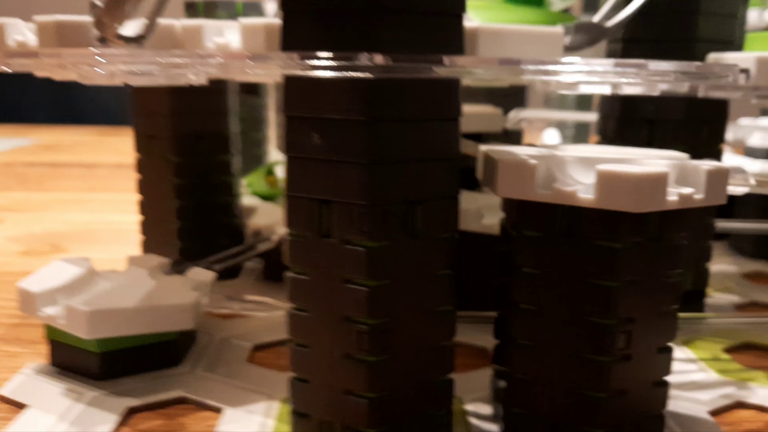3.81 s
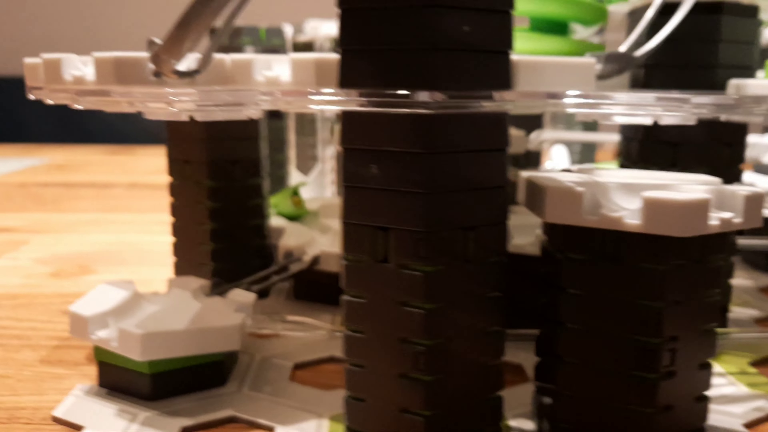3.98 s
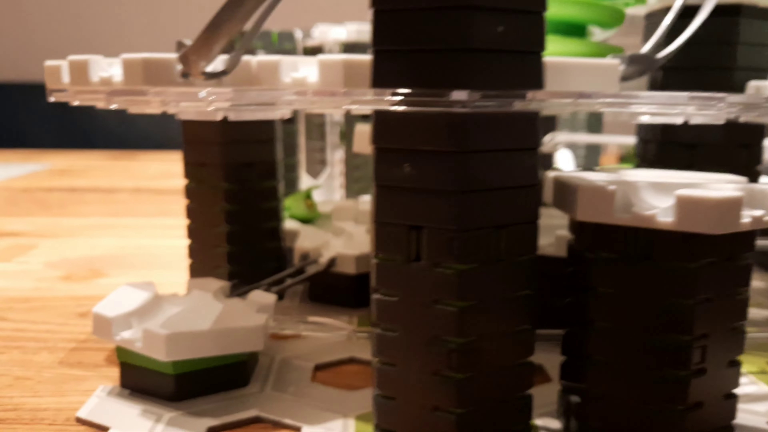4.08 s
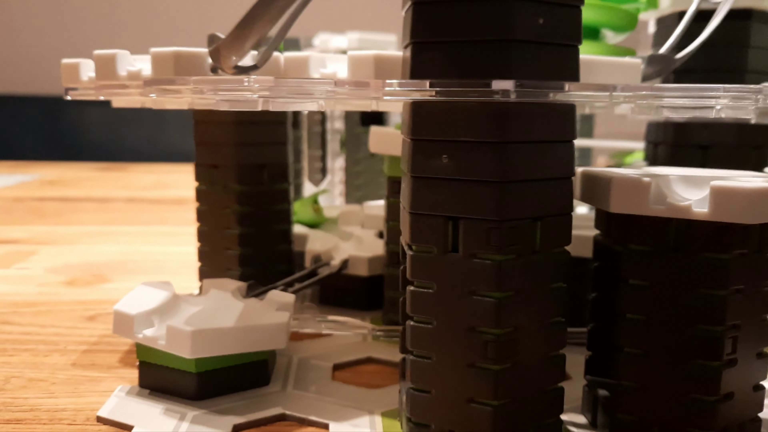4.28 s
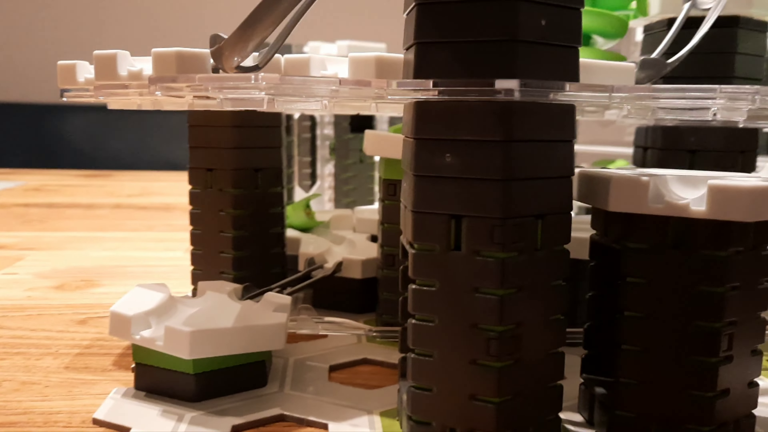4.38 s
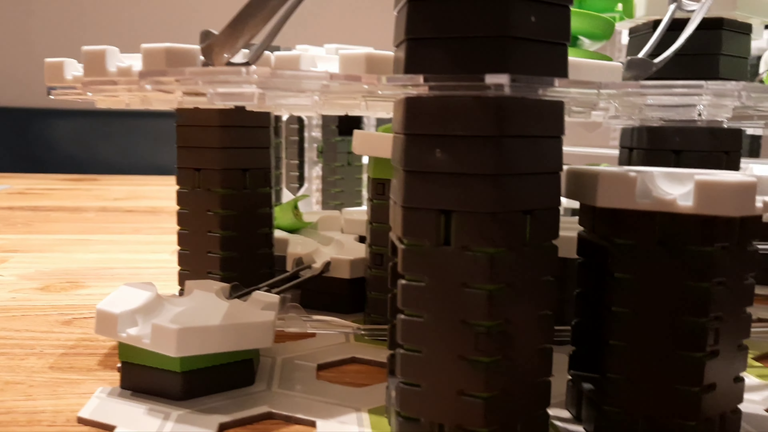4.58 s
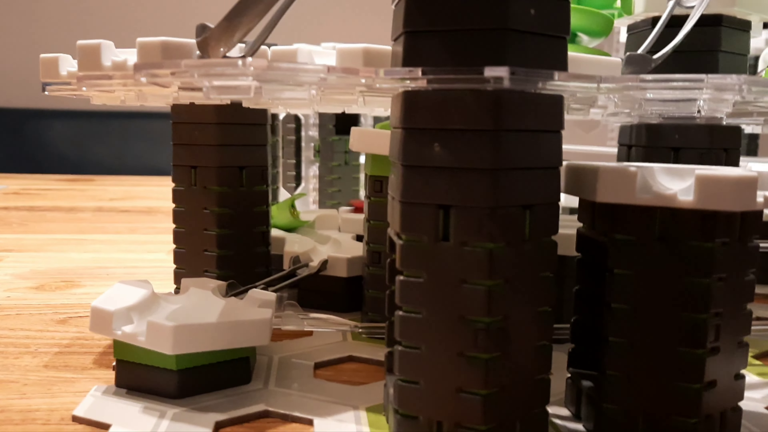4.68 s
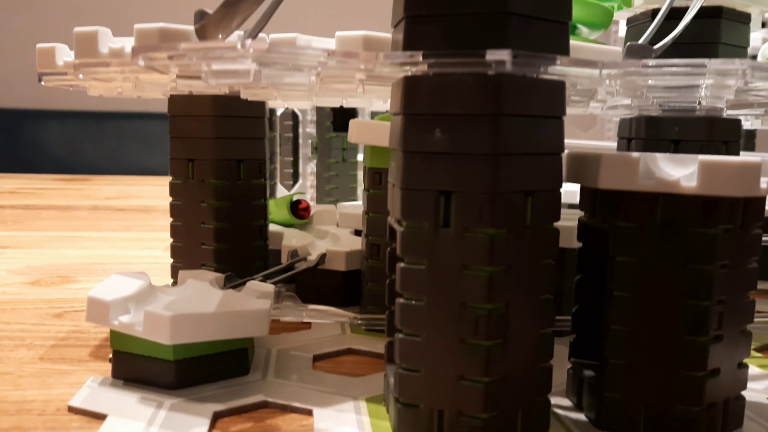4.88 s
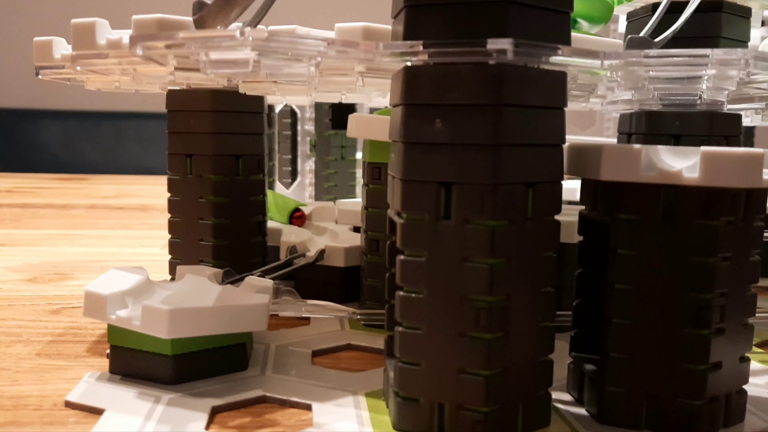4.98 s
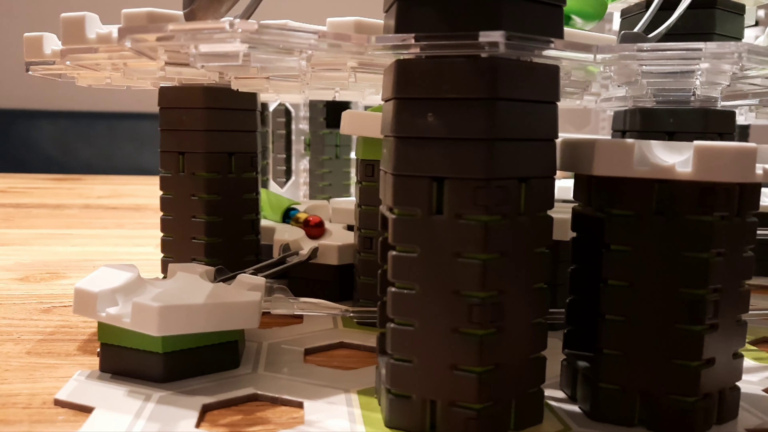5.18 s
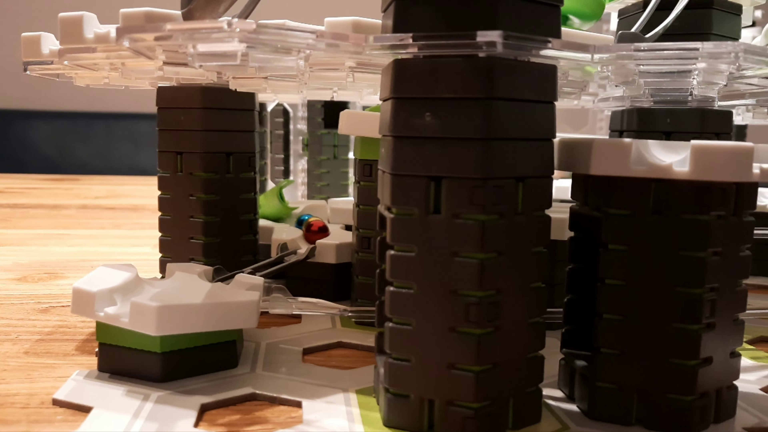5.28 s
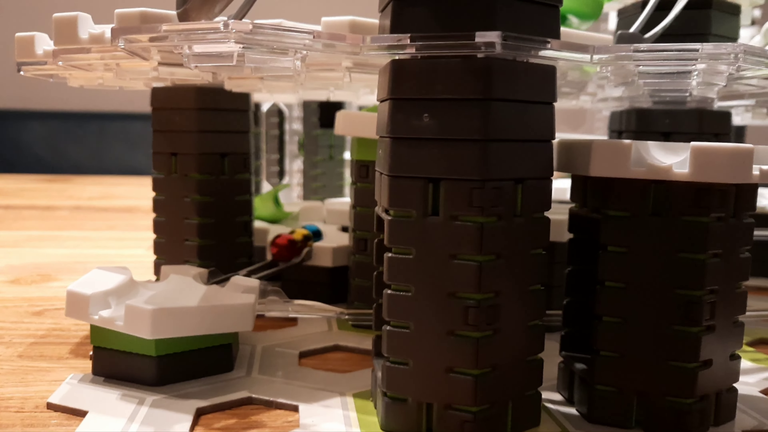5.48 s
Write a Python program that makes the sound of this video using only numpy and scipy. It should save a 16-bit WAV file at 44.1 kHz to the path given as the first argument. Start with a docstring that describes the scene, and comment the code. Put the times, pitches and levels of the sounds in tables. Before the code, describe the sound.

Close stereo pickup of a plastic marble run in a moderately reverberant room: scattered clicks, short gritty rolling, a loud clack near one second, a rapid rattling burst, a smooth roll accelerating into a sharp crack and airy swish, heavy soft knocks at left, and finally busy clacking to the end.

```python
"""Marbles clack through a plastic marble track on a wooden table in a live room: each clack is a contact
and a rebound, built of decaying plastic modes. Between the hits, trains of tiny random impacts make the
rumble, rattle and grit of rolling over tiles. One run swells down smooth rails as the marble gathers speed,
sets two low platform modes humming and lands with a bright smack, then a swish. Damped low modes give
thuds of the baseboard and finger bumps on the left; reverberation and quiet air noise lie behind."""
import sys
import numpy as np
from scipy import signal
from scipy.fft import rfft, irfft
from scipy.io import wavfile
from scipy.ndimage import uniform_filter1d

SR = 44100
rng = np.random.default_rng(int(sys.argv[2]) if len(sys.argv) > 2 else 0)


def store_pcm(level_fs):
    """Save levels as 16-bit WAV."""
    pcm = np.round(np.clip(level_fs, -1, 1) * 32767).astype(np.int16)
    wavfile.write(sys.argv[1], SR, np.atleast_2d(pcm).T)


N = 243873
TIME, FREQS = np.arange(N) / SR, np.fft.rfftfreq(N, 1 / SR)

# level difference between the microphones: (frequency [Hz], left minus right [dB])
SIDE_BALANCE = [(80, -0.5), (400, 2.5), (1000, 3.5), (2200, 0.5), (4500, -4), (8000, -3.5), (14000, 0)]
ROLL_ATTACK_S, ROLL_FADE_DB_PER_S = 0.023, 190  # onset and release of rolling on tiles and rails


def amp(db):
    """Level: 20 dB is a factor of ten in amplitude."""
    return 10 ** (np.asarray(db) / 20)


def unit(x):
    """Normalisation: scales a signal to an rms of 1."""
    return x / np.sqrt(np.mean(x ** 2) + 1e-20)


def read(points, hz):
    """Interpolation: reads (frequency, value) points linearly along a log-frequency axis."""
    f, value = np.transpose(points)
    return np.interp(np.log(hz + 1), np.log(f + 1), value)


def sides(db):
    """Stereo panning: left and right gains for a level difference."""
    return amp(np.array([db, -db]).reshape(2, -1) / 2)


def add(mix, s, sound):
    """Superposition: adds a stereo sound at time s."""
    part = mix[:, max(round(s * SR), 0):][:, :sound.shape[1]]
    part += sound[:, :part.shape[1]]


def pair(z, hz):
    """Spatial coherence: two unrelated spectra become alike in the bass and independent in the treble."""
    # (frequency [Hz], left-right correlation [1])
    likeness = [(60, 0.67), (200, 0.88), (450, 0.84), (1000, 0.52), (3000, 0), (16000, 0)]
    same = np.clip(read(likeness, hz), -1, 1)
    return np.array([z[0], same * z[0] + np.sqrt(1 - same ** 2) * z[1]])


def coloured(x, spectrum):
    """Linear filtering: gives a stereo excitation a spectrum and a place, at an rms of 1."""
    shape = amp(read(spectrum, FREQS)) * sides(read(SIDE_BALANCE, FREQS))
    return unit(irfft(pair(rfft(x), FREQS) * shape, N))


def resonate(x, hz, width):
    """Heterodyning: a one-pole low-pass on the demodulated signal is a movable resonance of gain 1."""
    turn = np.exp(2j * np.pi * np.cumsum(hz * np.ones(N)) / SR)
    r = np.exp(-np.pi * width / SR)
    baseband = signal.lfilter([1 - r], [1, -r], x / turn + 1e-18)
    return 2 * (turn * baseband).real


def high_pass(x, hz):
    """High-pass filtering: removes the lows beneath the clacks, thuds and bumps."""
    return signal.sosfilt(signal.butter(3, hz, "high", fs=SR, output="sos"), x)


def envelope(start, length, swell_db, attack_s, fade_db_per_s):
    """Excitation strength: attack, a hold that swells or sags in level (0 dB halfway), and release."""
    t = TIME - start
    hold_db = swell_db * (np.clip(t / length, 0, 1) - .5)
    return np.clip(t / attack_s, 0, 1) * amp(hold_db - fade_db_per_s * np.maximum(t - length, 0))


def clacks(rebound_s=.0113):
    """Impact and rebound: a marble hits, hops once and lands; returns direct sound and room feed."""
    # one row a clack, levels before the track resonances and high-pass: (time [s], blow level [dB],
    # weight of the struck piece [dB], snap [dB], room feed re each blow [dB], rebound re first blow [dB])
    impacts = [(0.0327, -34, -2.5, -14, -10, -19), (.1945, -30.5, -7.5, -16, -9, -0.5),
               (.3345, -42.5, -5, -21, -10.5, -2), (0.5493, -50, -17, -18, 0, -6.5),
               (0.7382, -53.5, -1.5, -11, -3, -30), (0.8805, -13.5, -11, -16, -2.5, -44),
               (1.343, -45.5, -20, -41, .5, -25), (1.4862, -29, -8, -28, -2, -12),
               (1.508, -33.5, -0.5, -28, -3, -3), (1.5378, -24, -14, -11, -9.5, 0),
               (1.6059, -22, -12.5, -12, -5.5, -27), (1.6475, -17.5, -20.5, -14, -8.5, -9),
               (1.6659, -20.5, -21, -16, -23, -25), (1.7325, -26, -43, -17, -22, -30),
               (1.7713, -31, -20.5, -14.5, -3, -1), (1.8202, -21.5, -10.5, -11.5, -7.5, -2.5),
               (1.8977, -27.5, -8.5, -18, -3, -10), (1.9264, -25.5, -5.5, -18, -9, -6),
               (1.953, -26, -10.5, -15, -26, -23), (2.0178, -40, -6, -8, -13, -1),
               (2.0867, -39.5, -9, -16, -4.5, -0.5), (2.149, -41, -1.5, -18, 6, -28),
               (2.187, -31.5, -11.5, -15, -1.5, 4), (2.3067, -32, -7, -17, -9.5, -9.5),
               (2.4054, -42, -9, -12, -0.5, -22), (3.2248, -17.5, -27, 4, .5, -14),
               (3.789, -44, 5, -3, -4, -20), (3.8485, -35.5, -7.5, -15, -9, -13),
               (3.922, -40.5, -13, -14, 3, -25), (3.9862, -37, -24, -14.5, -2, -23),
               (4.2331, -48.5, -13, -10, -2.5, -20), (4.296, -43, -12, -4, 2, -23),
               (4.345, -38.5, -26, -10, 1, -22), (4.3801, -31.5, -43, -16, 4.5, -17),
               (4.4476, -28, -23, -16, -0.5, -26), (4.4832, -20, -11.5, -14.5, -3.5, 5.5),
               (4.6948, -19.5, -13, -4, -5, -25), (4.7295, -17, -14, -15, -6.5, -4),
               (4.8106, -26, -16, -16, 2, -23), (4.8659, -19.5, -7.5, -19.5, -7, -4),
               (4.9284, -21.5, -14.5, -10.5, -2.5, -23), (5.0862, -34.5, -3, -1, 0, -47),
               (5.1033, -29, -11, -10, -18.5, 0), (5.1814, -35.5, -2.5, -24, -5.5, -9),
               (5.2384, -39, -28, -10.5, -7, -17), (5.2757, -34.5, -4, -14, -1.5, -14),
               (5.3258, -39.5, 0, -18, -7, -25), (5.3474, -27.5, -1.5, -13, -7, -13),
               (5.4028, -18, -14, -12, -8, -10)]
    # part of the track reached: (time [s], left minus right [dB], ring of the pieces there [Hz])
    places = [(.2, 9.5, 2410), (0.501, -17, 1340), (.88, 1, 2730), (1.3, 4, 1020), (1.5, -3.5, 1485),
              (1.9, -2.5, 1668), (2.299, -1, 1089), (3.2, -2.5, 5670), (3.8, 4, 1440), (4.45, 3.5, 1990),
              (4.7, 0.5, 1966), (4.87, 4.5, 1480), (5.4, 3.5, 1595)]
    direct, feed = np.zeros((2, 2, N))
    reached_s, *place = np.transpose(places)
    for s, db, weight_db, snap_db, room_db, rebound_db in impacts:
        side_db, ring_hz = (np.interp(s, reached_s, column) for column in place)
        for at, force_db in ((s, db), (s + rebound_s, db + rebound_db)):
            hit = amp(force_db) * strike(weight_db, snap_db, ring_hz)
            add(direct, at, sides(side_db) * hit)
            add(feed, at, amp(room_db) * hit)
    return high_pass(track(np.array([direct, feed])), hz=159)


def strike(weight_db, snap_db, ring_hz, ring_db=-2, ring_t60=0.035, ring_spread=0.069, scatter=0.18,
           rise_s=0.00084, count=5):
    """Modal decay: dense bands of plastic modes plus the struck piece's own cluster of modes."""
    # body, middle, clack and snap: (low edge [Hz], high edge [Hz], relative level [dB], t60 [s])
    plastic_bands = [(263, 910, -0.5, 0.042), (934, 2910, -0.5, 0.029), (3310, 7820, -3, 0.019),
                     (10500, 13200, 9, 0.021)]
    t, hz = np.arange(4096) / SR, np.fft.rfftfreq(4096, 1 / SR)
    rise = 1 - np.exp(-t / rise_s)  # the blow takes a moment to spread through the piece
    middle_db = 0.65 * weight_db  # heavy pieces sound in the middle too
    hit = np.zeros((2, len(t)))
    for (lo, hi, band_db, t60), colour_db in zip(plastic_bands, (weight_db, middle_db, 0, snap_db)):
        band = 1 / np.sqrt((1 + (lo / (hz + 1)) ** 10) * (1 + (hz / hi) ** 10))
        random_phases = np.exp(2j * np.pi * rng.random((2, len(hz))))
        modes = irfft(pair(random_phases, hz) * band)
        fade = amp(-60 * t / t60) * rise
        hit += amp(colour_db + band_db) * unit(modes * fade) * np.sqrt(np.mean(fade ** 2))
    ring = np.zeros((2, len(t)))
    for f in ring_hz * (1 + ring_spread * rng.standard_normal(count)):
        cycles = f * t + rng.random() + scatter * rng.standard_normal((2, 1))  # phase differs by side
        ring += np.sin(2 * np.pi * cycles)
    return hit + amp(ring_db + middle_db - 60 * t / ring_t60) * ring / np.sqrt(count) * rise


def track(x):
    """Forced resonance: the tiles and towers add their modes to whatever shakes them."""
    # (frequency [Hz], width [Hz], level re input [dB])
    tile_modes = [(340, 43, -15), (466, 130, -6.5), (560, 17, -12), (950, 370, -10), (1392, 320, -10),
                  (1500, 220, -11.5), (2040, 164, -8), (2590, 250, -9.5), (4940, 150, -46),
                  (5760, 3600, -1), (8430, 370, -7)]
    ringing = sum(amp(db) * signal.lfilter(*signal.iirpeak(hz, hz / width, SR), x)
                  for hz, width, db in tile_modes)
    return x + ringing


def tile_rolling(trims_db=(-3, -3, -4)):
    """Roughness excitation: the same small impacts give rumble, rattle and grit on the tiles."""
    # spectra before normalisation: (frequency [Hz], relative level [dB])
    rumble_spectrum = [(40, -65), (100, -2.5), (210, -5.5), (320, 7), (520, 6.5), (750, 7.5), (1000, 3),
                       (1300, -49.5), (3000, -80)]
    rattle_spectrum = [(600, -18.5), (1100, -1), (1500, 1), (2000, -2.5), (2700, -5.5), (3500, -10),
                       (8000, -64)]
    grit_spectrum = [(1200, -17), (3000, -8), (4500, -1), (6400, 1), (8400, -4.5), (9800, -3),
                     (12500, -3.5), (16000, -4.5)]
    # stretches of tile, levels halfway and before the trims: (start [s], length [s], rumble [dB],
    # rattle [dB], grit [dB], swell over the stretch [dB])
    stretches = [(-.02, 0.042, -42.5, -44.5, -51.5, 0), (0.058, 0.12, -50.5, -54, -72, 12),
                 (0.92, 0.13, -39.5, -38.5, -40, -11), (1.279, 0.077, -52, -64.5, -79.5, -3),
                 (1.39, .15, -52.5, -46, -52, 20.5), (1.572, 0.092, -44.5, -42, -64, 3),
                 (1.822, 0.13, -57.5, -49, -49, 14.5), (2.174, 0.12, -44.5, -50, -44, -8),
                 (3.54, 0.091, -50.5, -48, -55, 0), (3.67, 0.15, -85, -48, -43.5, -5),
                 (3.882, 0.35, -59.5, -52, -63, 0.5), (4.365, 0.078, -59, -50, -37, 1),
                 (4.73, .27, -43, -42, -58, 2.5), (5.066, 0.28, -45.5, -51, -71, -3),
                 (5.343, 0.11, -47, -42, -67, 5.5)]
    jolts = track(travelling(contacts(per_s=2200, spread_db=2.5)))
    voices = [coloured(jolts, spectrum) for spectrum in (rumble_spectrum, rattle_spectrum, grit_spectrum)]
    gains = np.zeros((3, N))
    for start, length, *levels_db, swell_db in stretches:
        shape = envelope(start, length, swell_db, ROLL_ATTACK_S, ROLL_FADE_DB_PER_S)
        gains += amp(levels_db)[:, None] * shape
    return sum(amp(db) * gain * voice for db, gain, voice in zip(trims_db, gains, voices))


def contacts(per_s, spread_db):
    """Random impulse train: a ball on a rough surface makes tiny impacts, a few of them large."""
    struck = rng.random(N) < per_s / SR
    size = amp(spread_db * np.minimum(rng.exponential(1, N), 5)) * struck
    return unit(size * rng.standard_normal((2, N)))


def travelling(x, echo_db=-9, wander_s=0.000986):
    """Comb filtering: bounces off table and towers lengthen and shorten as a marble moves."""
    out = x.copy()
    for delay_s, wander_hz in [(.0026, .7), (.0053, 1.1), (.009, .45)]:
        lag = delay_s + wander_s * np.sin(2 * np.pi * (wander_hz * TIME + rng.random()))
        out += amp(echo_db) * np.array([np.interp(TIME - lag, TIME, channel) for channel in x])
    return out


def rail_rolling(sing_hz=4500, sing_width_hz=180, sing_db=-8):
    """Fine roughness: smooth rails give a dense grain that sings faintly and swells with speed."""
    # spectra before normalisation: (frequency [Hz], relative level [dB])
    rumble_spectrum = [(60, -22), (130, -1), (210, -12), (320, -5), (470, 1.5), (650, -5), (900, -6.5),
                       (1400, -12.5), (2500, -24), (4200, -23.5)]
    hiss_spectrum = [(1600, -8.5), (2800, -4), (3300, -7.5), (4100, -3.5), (5200, -5), (6500, -5),
                     (8500, -17), (10000, -10.5), (12000, -14), (13800, -4), (16000, -21)]
    start_s, length_s, swell_db = 2.343, 0.862, 21
    rumble_db, hiss_db, hiss_share = -50.5, -55.5, 0.59  # levels halfway; the hiss swells less
    grain = travelling(contacts(per_s=9000, spread_db=1.5))
    hiss = coloured(grain, hiss_spectrum)
    song = amp(sing_db) * unit(resonate(grain, sing_hz, sing_width_hz))
    low, high = (envelope(start_s, length_s, db, ROLL_ATTACK_S, ROLL_FADE_DB_PER_S)
                 for db in (swell_db, hiss_share * swell_db))
    rumble = amp(rumble_db) * low * coloured(grain, rumble_spectrum)
    return rumble + amp(hiss_db) * high * (hiss + song) + swish(grain, hiss)


def swish(grain, hiss, width_hz=1350, upper_db=-2.5):
    """Gliding resonance: as a marble sweeps away, two resonances draw together over a dying hiss."""
    start_s, length_s, attack_s, fade_db_per_s = 3.228, .33, 0.12, 138
    swish_db, swish_swell_db = -38.5, -7.5
    rush_db, rush_swell_db = -37.5, -19  # the wide hiss dies as the marble slows
    start_hz, meet_hz, settle_s = (990, 5170), 2807, 0.26  # both pitches approach meet_hz
    settled = 1 - np.exp(-np.maximum(TIME - start_s, 0) / settle_s)
    centres = [hz * (meet_hz / hz) ** settled for hz in start_hz]
    # each resonance is two equal stages in series
    lower, upper = (resonate(resonate(grain, f, width_hz), f, width_hz) for f in centres)
    swish_gain, rush_gain = (envelope(start_s, length_s, db, attack_s, fade_db_per_s)
                             for db in (swish_swell_db, rush_swell_db))
    tone = unit(lower + amp(upper_db) * upper)
    return amp(swish_db) * swish_gain * tone + amp(rush_db) * rush_gain * hiss


def platform_hum(waver=0.0206):
    """Modal vibration: two low modes with wavering pitch sound while the marble crosses the platform."""
    # (lower mode [Hz], upper mode [Hz])
    mode_hz = (74.5, 144.5)
    # levels halfway: (start [s], length [s], lower mode [dB], upper mode [dB], swell [dB])
    crossings = [(3.151, 0.22, -37, -40.5, -0.5), (3.48, 0.14, -53, -71, -8)]
    gains, out = np.zeros((2, N)), np.zeros(N)
    for start, length, *levels_db, swell_db in crossings:
        shape = envelope(start, length, swell_db, attack_s=0.039, fade_db_per_s=257)
        gains += amp(levels_db)[:, None] * shape
    for hz, gain in zip(mode_hz, gains):
        drift = unit(uniform_filter1d(rng.standard_normal(N), size=2000))
        out += gain * unit(np.sin(2 * np.pi * np.cumsum(hz * (1 + waver * drift)) / SR))
    return out


def baseboard_thuds():
    """Plate excitation: heavy landings shake low modes of the baseboard."""
    # levels before the high-pass: (time [s], level [dB], frequency [Hz], t60 [s])
    landings = [(0.349, -42, 323, 0.067), (0.552, -34.5, 150, 0.021), (0.560, -29.5, 282, 0.032),
                (0.571, -37.5, 106, 0.034), (0.884, -37, 404, 0.17), (0.93, -35.5, 271, 0.12),
                (2.19, -40, 174, 0.12), (2.24, -35, 114, 0.15), (4.497, -35, 125, .05)]
    return knocks(landings, rub_db=-4.0, rub_hz=557)


def finger_bumps():
    """Near-field contact: fingers bump beside the left microphone, so the right hears 28 dB less."""
    # levels on the left before the high-pass: (time [s], level [dB], frequency [Hz], t60 [s])
    touches = [(3.792, -4.5, 269, 0.02), (3.802, -19.5, 351, 0.097), (3.823, -22.5, 238, 0.19),
               (3.850, -9, 306, 0.034), (4.048, -39, 200, 0.034), (4.145, -31, 152, 0.018),
               (4.351, -28.5, 329, 0.018), (4.428, -24, 310, 0.031), (4.457, -21, 313, 0.054),
               (4.484, -16, 285, 0.021)]
    return knocks(touches, rub_db=-16, rub_hz=1020) * amp([[0], [-28]])


def knocks(rows, rub_db, rub_hz):
    """Damped oscillation: each soft blow is one decaying low mode and a short dull scuff."""
    out, t = np.zeros((2, N)), np.arange(SR // 4) / SR
    dull = signal.butter(2, rub_hz, fs=SR, output="sos")
    for s, db, hz, t60 in rows:
        scuff = unit(signal.sosfilt(dull, rng.standard_normal(len(t))))
        blow = amp(db - 60 * t / t60) * (np.sin(2 * np.pi * hz * t) + amp(rub_db) * scuff)
        add(out, s, np.array([blow, blow]))
    return high_pass(out, hz=82)


def room(x, build_s=0.0045):
    """Reverberation: dense reflections from table, towers and walls; the highest treble dies first."""
    # (frequency [Hz], t60 [s], relative level [dB])
    decay = np.array([(100, 0.49, 1), (295, 0.42, 3), (806, 0.41, 2.5), (2900, 0.53, 3), (5450, 0.43, 1.5),
                      (10100, 0.38, -2.5), (14200, 0.29, 0.5)])
    hz, t, z = signal.stft(rng.standard_normal((2, SR)), SR, nperseg=512)
    t60, db = read(decay[:, :2], hz)[:, None], read(decay[:, ::2], hz)[:, None]
    z = pair(z, hz[:, None]) * sides(read(SIDE_BALANCE, hz))[:, :, None]
    z *= amp(db - 60 * t / t60) * np.sqrt(np.log(1e6) / (t60 * SR))  # equal energy for any t60
    tail = signal.istft(z, SR, nperseg=512)[1][:, :SR] * (1 - np.exp(-TIME[:SR] / build_s))
    return signal.fftconvolve(x, tail, axes=1)[:, :N]


def quiet_air():
    """Stationary noise: Gaussian noise with a fixed spectrum forms the background."""
    # before normalisation: (frequency [Hz], relative level [dB])
    air_spectrum = [(25, -9), (70, 19), (200, 15), (500, 19), (1200, -38), (3000, -92), (7000, -3),
                    (8400, -11), (9500, -8), (16000, -14)]
    return amp(-65.5) * coloured(rng.standard_normal((2, N)), air_spectrum)


def scene():
    """Superposition: track sounds with their room, finger bumps and quiet air."""
    direct, feed = clacks()
    rolling = tile_rolling() + rail_rolling()
    thuds = baseboard_thuds()
    reflected = room(amp(4) * feed + amp(-9.5) * rolling + amp(-2.5) * thuds)
    return direct + rolling + platform_hum() + thuds + finger_bumps() + reflected + quiet_air()


def record(dry):
    """Transducer response: the microphones dip in the treble, then a low-pass limits the band."""
    # (frequency [Hz], gain [dB])
    response = [(8400, 0), (9200, -3), (10000, -7), (11300, -3)]
    edge_hz = 15950
    heard = irfft(rfft(dry) * amp(read(response, FREQS)), N)
    band_limit = signal.firwin(255, edge_hz, window=("kaiser", 9), fs=SR)
    return signal.oaconvolve(heard, band_limit[None], "same", axes=1)


dry = scene()
out = record(dry)
store_pcm(out)
```